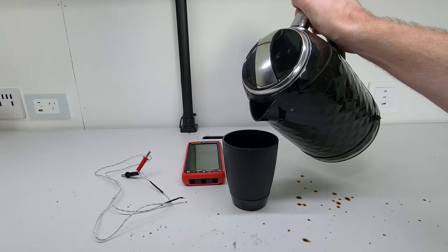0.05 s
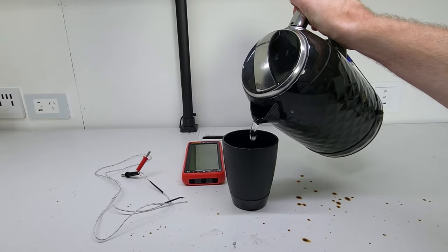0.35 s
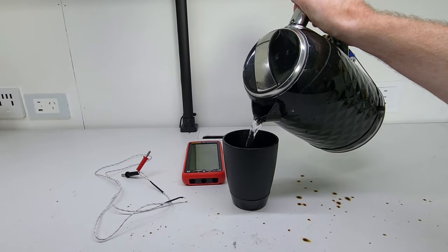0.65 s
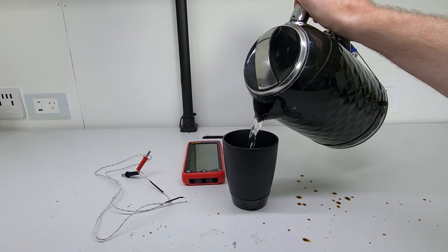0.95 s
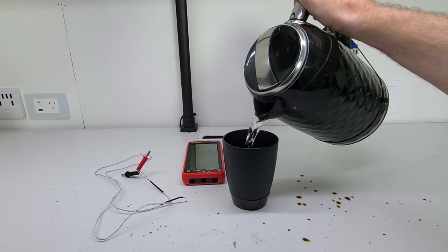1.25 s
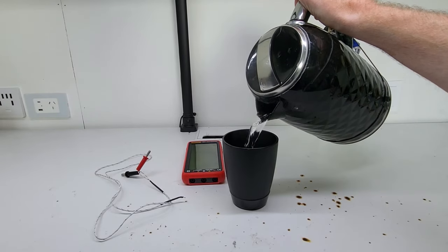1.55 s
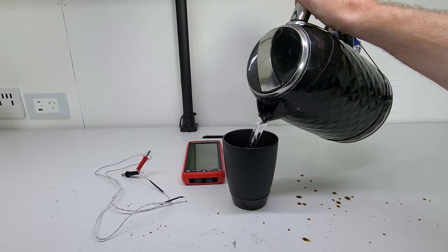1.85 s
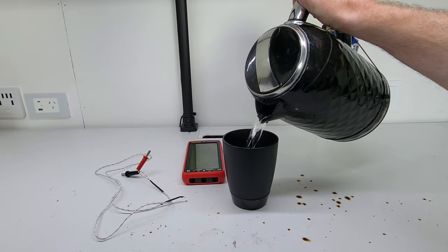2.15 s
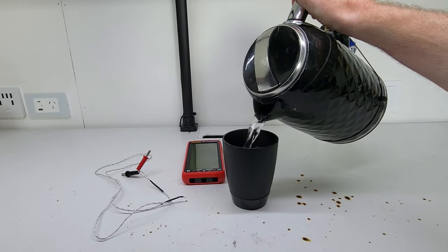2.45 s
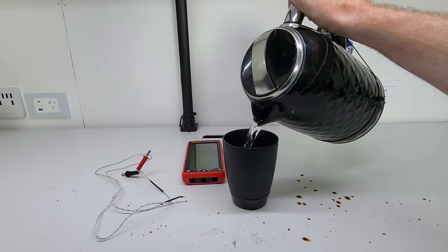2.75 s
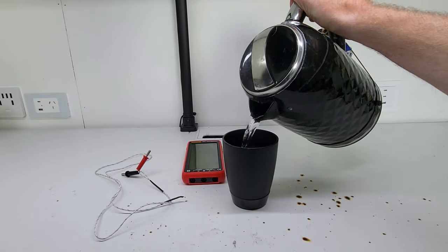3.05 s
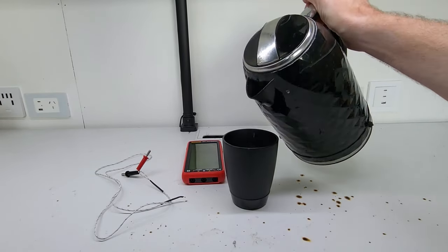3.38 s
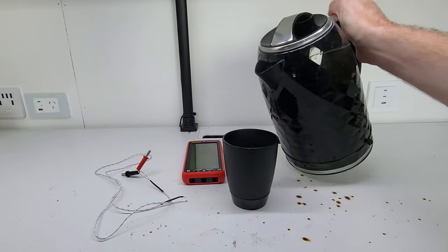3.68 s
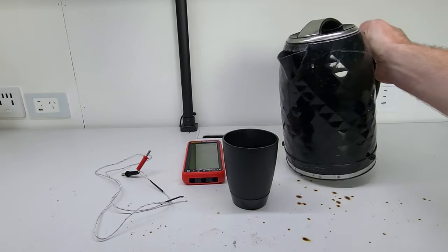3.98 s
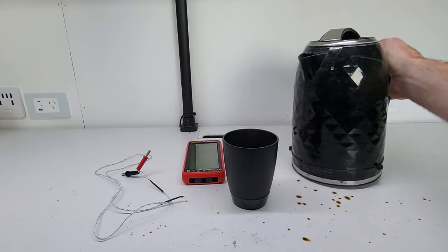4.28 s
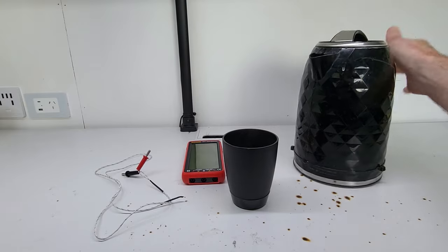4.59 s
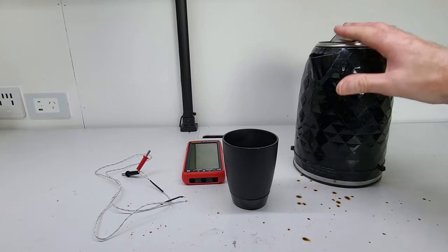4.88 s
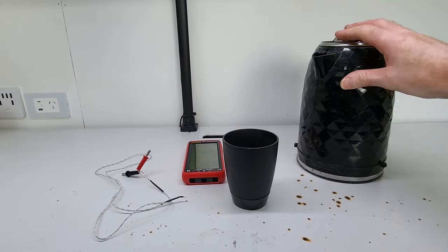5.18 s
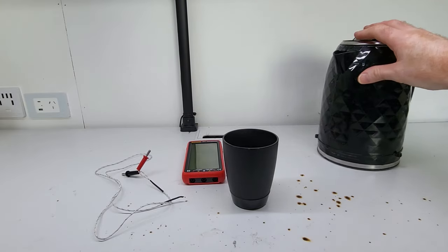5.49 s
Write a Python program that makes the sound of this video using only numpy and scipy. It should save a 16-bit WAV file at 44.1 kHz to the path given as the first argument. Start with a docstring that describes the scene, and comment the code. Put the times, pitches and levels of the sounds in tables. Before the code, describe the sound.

A low ventilation rumble and the faint simmer of a hot electric kettle run underneath, in a small room with little echo. At about 0.5 seconds the first drops tick into a cup, and a thin stream of water follows. The pour is fullest from about 1.1 to 2.3 seconds, with fine spray, small splashes, gurgles and ringing bubbles, while a hollow note rises as the cup fills. The stream thins with a few soft, deep plops and ends around 3.4 seconds. At 4.1 seconds the kettle lands on a workbench and rocks on its base, making a quick run of hollow clunks, thuds and light lid rattles. These are much louder than the pour, peaking near 4.4 seconds and settling by 4.6. Water sways faintly inside. From about 5.1 seconds the kettle is pushed across the bench with a light knock and a chattering, grinding scrape, lasting until about 5.5 seconds.

```python
"""Hot water trickles from an electric kettle into a cup on a workbench.
The stream sprays and gurgles, drops tick, bubbles ring, and the air in the cup sounds a rising note.
The kettle is set down and rocks on its base with hollow clunks. Then it is pushed across the bench,
and its foot chatters as it sticks and slips. Behind it all, the kettle simmers softly
and the ventilation of the small room rumbles."""
import sys
import numpy as np
from scipy import signal
from scipy.fft import rfft, irfft
from scipy.io import wavfile
from scipy.ndimage import uniform_filter1d

SR = 44100
rng = np.random.default_rng(int(sys.argv[2]) if len(sys.argv) > 2 else 0)


def store_wav(level_fs):
    """Save 16-bit WAV to argv[1]."""
    pcm = np.round(np.clip(np.atleast_2d(level_fs), -1, 1) * 32767)
    wavfile.write(sys.argv[1], SR, pcm.T.astype(np.int16))


N = 243867
TIME = np.arange(N) / SR

# A "colour" says how strong low and high sounds are. A fade time (t60) is the time to fall by 60 dB.
# Levels in the tables are relative: the functions turn them up or down.
# colour of the ventilation: (frequency [Hz], level [dB])
VENT_COLOUR = [(25, -36.5), (42, -9), (69, -5), (104, -6.5), (169, -31), (235, -20), (520, -24.5),
               (1100, -28.5), (1750, -41), (4750, -47.5), (6200, -38.5), (7200, -41), (8600, -61.5),
               (12000, -50.5), (15500, -53)]
# the simmer, quietest while the kettle is tipped furthest and lifted away: (time [s], level [dB])
SIMMER_LEVELS = [(0, -56), (2.1, -62), (2.9, -76), (3.6, -72.5), (5.53, -61)]
# colour of the simmer: (frequency [Hz], level [dB])
SIMMER_COLOUR = [(100, -1), (250, -2.5), (600, -5), (900, -6), (1080, 0.5), (1240, 6.5), (1400, 0.5),
                 (1650, -13), (2300, -22.5), (4000, -55), (9000, -101.5)]
# drops that tick on the water: (time [s], level [dB], pitch [Hz])
DROPS = [(0.4407, -53, 6100), (0.6453, -43.5, 5700), (0.7193, -50, 6100), (0.7953, -40.5, 5830),
         (0.836, -51, 5940), (0.963, -48.5, 5900), (1.0545, -39, 5770), (1.3245, -39.5, 6030),
         (1.3424, -37, 5630), (1.3673, -42, 6400), (1.414, -39, 6500), (1.4314, -33.5, 5800),
         (1.485, -55, 5700), (1.5, -39, 5600), (1.6587, -39, 5600), (1.7823, -43, 6030),
         (1.8683, -42.5, 5550), (2.017, -44, 5660), (2.151, -43, 3500), (2.1736, -39, 6300),
         (2.2478, -41, 6500), (2.7678, -42.5, 4840), (2.9717, -49, 6400), (3.0689, -44, 4000),
         (3.1423, -48, 4530), (3.3836, -41, 7140)]
# colour of scattered droplets: (frequency [Hz], level [dB])
SPATTER_COLOUR = [(500, -2), (2000, 0), (3500, -3), (5000, -1.5), (7000, 1), (8600, -11.5), (11000, -9.5),
                  (15500, -18)]
# tones of the air in the cup: (pitch [Hz], width [Hz], level [dB])
CUP_TONES = [(1230, 480, 10.5), (1900, 520, 3.5), (3480, 630, -8), (443, 500, -3.5)]
# strength of the stream: (time [s], level [dB])
FLOW_LEVELS = [(0.62, -76), (0.98, -80), (1.15, -66.5), (1.42, -65.5), (1.95, -70), (2.6, -72.5),
               (2.88, -77.5), (3.4, -81)]
# colour of the fine spray: (frequency [Hz], level [dB])
SPRAY_COLOUR = [(300, -7.5), (1000, -5), (2500, -3.5), (3500, 5), (4700, -2), (5800, 10), (7200, 7.5),
                (8600, -19.5), (11000, -27), (15500, -11)]
# single bubbles in the cup: (time [s], level [dB], pitch [Hz])
BUBBLES = [(0.733, -53, 1890), (0.758, -63.5, 3230), (0.876, -47.5, 1046), (0.893, -50, 3380),
           (0.966, -46.5, 1037), (0.989, -50, 1010), (1.129, -46.5, 1027), (1.303, -47, 1350),
           (1.392, -44.5, 1203), (1.787, -48, 1220), (1.85, -45, 1306), (2.018, -47.5, 1257),
           (2.039, -46.5, 1340), (2.151, -49, 1320), (2.161, -43.5, 1300), (2.359, -33.5, 1304),
           (2.375, -47, 1370), (2.442, -52, 1846), (2.481, -49.5, 1404), (2.646, -54, 2880),
           (2.684, -45.5, 1340), (2.935, -51, 1410), (3.292, -51.5, 1890), (3.336, -54, 1900)]
# deep glugs inside the kettle: (time [s], level [dB])
PLOPS = [(2.724, -44.5), (3.051, -44.5), (3.349, -45)]
# the stream breaks up and spatters: (time [s], level [dB], fade time [s])
SPLASHES = [(0.835, -63.5, 0.48), (1.391, -60, .35), (1.485, -59, 0.099), (1.597, -49, 0.041),
            (1.618, -57.5, 0.31), (1.702, -53.5, 0.032), (1.781, -52, .1), (1.849, -60.5, 0.057),
            (2.152, -57, 0.19), (2.6808, -54.5, 0.1), (2.7132, -56, 0.11), (2.836, -66, 0.075),
            (3.384, -86, 0.073)]
# the kettle hits the bench: (time [s], thud [dB], ring [dB], tick [dB], how flat it lands [0-1])
KNOCKS = [(4.1367, -10, -18.5, -48, 0.01), (4.2451, -12, -21.5, -35.5, 0.2), (4.31, -24.5, -42, -49, 0.9),
          (4.366, -24.5, -40, -41, 0.6), (4.381, -8.5, -19.5, -14.5, 1), (4.3928, -17, -24, -41, 1),
          (4.4211, -14, -19.5, -26, 0.5), (4.5542, -19, -27, -37, 0.79), (4.566, -22, -49, -48, 1),
          (5.168, -29.5, -34, -68, 0.7)]
# tones of the bench top: (pitch [Hz], level [dB], fade time [s])
BENCH_TONES = [(55.5, -12, 0.61), (82.1, -5, 0.27), (113.3, 6, 0.07), (151.6, 8.5, 0.073),
               (180.7, -6.5, 0.15), (245, -13.5, 0.28)]
# tones of the kettle's shell: (pitch [Hz], level on its rim [dB], level when flat [dB], fade time [s])
SHELL_TONES = [(363.6, -10.5, -9.5, 0.31), (442, -13, 0.5, 0.15), (475, -10, 4, 0.09),
               (534, -15, -7.5, 0.23), (590, -13, -9.5, 0.19), (689, 5, -1, 0.072), (829, -12.5, -11, 0.18),
               (1110, -4, -16, 0.063), (1208, -22, 14.5, 0.026), (1365, 6.5, -14, 0.059),
               (1495, -10, -23, 0.073), (1780, -28, -4.5, 0.036), (1798, -28, -4, 0.05),
               (2010, -12, -9.5, 0.065), (2300, -12, -37, 0.042), (2610, -6, -40, 0.032),
               (2870, -24, 0.5, 0.026), (3240, -32, -12, 0.048), (3700, -36, -18, 0.033)]
# colour of the shell's toneless clatter: (frequency [Hz], level [dB])
CLATTER_COLOUR = [(120, -42), (230, -2), (310, -5.5), (450, 18), (700, 3.5), (950, 6), (1350, 11),
                  (1700, 4), (2500, -3), (4000, -17.5), (7000, -16), (9000, -32.5), (15000, -31)]
# light ticks of the lid and rim: (time [s], level [dB])
LID_TICKS = [(4.141, -24.5), (4.4962, -32.5), (4.521, -40), (4.532, -31.5), (4.596, -43)]
# colour of a hard tick: (frequency [Hz], level [dB])
TICK_COLOUR = [(500, -4), (1300, 13), (2900, 9), (4800, 6.5), (7200, 4), (8600, -9.5), (12000, -7),
               (15500, -17)]
# the rim rubs on the bench as the kettle settles: (time [s], length [s], level [dB], pitch [Hz])
RUBS = [(4.53, 0.013, -46.5, 2970), (4.71, 0.19, -71.5, 2530)]
# colour of the foot grinding on the bench: (frequency [Hz], level [dB])
GRIND_COLOUR = [(35, -28), (60, -29), (118, 0.5), (171, -7), (215, -20), (305, -8), (443, -16.5),
                (613, -21), (1120, -11.5), (1670, -19.5), (2650, -19), (3190, -20.5), (5840, -20),
                (7300, -23), (8300, -35), (15500, -77)]
# tones of the sliding base: (pitch [Hz], width [Hz], level [dB])
BASE_TONES = [(435, 35, 3), (805, 17, -4), (1135, 14, -4), (1790, 45, -4.5), (2560, 45, -5.5),
              (3660, 280, -18)]


def undb(db):
    """Turn decibels into a number to multiply by."""
    return 10 ** (np.asarray(db) / 20)


def unit(x):
    """Scale a sound to an average power of 1."""
    return x / np.sqrt(np.mean(x ** 2))


def fade(t, t60):
    """Die away, 60 dB down after t60 seconds."""
    return np.exp(-np.log(1000) * t / t60)


def swell(start_s, rise_s):
    """Rise smoothly from 0 towards 1."""
    return 1 - np.exp(-np.maximum(TIME - start_s, 0) / rise_s)


def curve(rows, attack_s=0.0086, release_s=0.039):
    """Follow (time [s], level [dB]) rows, fading to silence outside them."""
    s, db = np.transpose(rows)
    outside = np.maximum(s[0] - TIME, 0) / attack_s + np.maximum(TIME - s[-1], 0) / release_s
    return undb(np.interp(TIME, s, db)) * np.exp(-outside)


def wander(per_second):
    """Drift at random around 0, typically by about 1."""
    step = int(SR / per_second)
    stairs = np.repeat(rng.standard_normal(N // step + 1), step)
    return unit(uniform_filter1d(stairs, step)[:N])


def add(out, s, sound):
    """Mix a sound in at s seconds."""
    i = int(s * SR)
    out[..., i:i + sound.shape[-1]] += sound[..., :max(N - i, 0)]


def convolve(x, response):
    """Let every sample of x set off a copy of the response."""
    return signal.fftconvolve(np.atleast_2d(x), np.atleast_2d(response), axes=-1)[:, :x.shape[-1]]


def colour(x, points, size=4096):
    """Shape a sound with a colour table; white noise keeps its power."""
    hz, db = np.transpose(points)
    grid_hz = np.maximum(np.fft.rfftfreq(size, 1 / SR), 1)
    gains = undb(np.interp(np.log(grid_hz), np.log(hz), db))
    # build the filter so that it never sounds before its input does
    cepstrum = irfft(np.log(gains))
    cepstrum[1:size // 2] *= 2
    cepstrum[size // 2 + 1:] = 0
    response = irfft(np.exp(rfft(cepstrum)))
    return convolve(x, response / np.linalg.norm(response))


def keep(x, hz, kind, order):
    """Keep the "low" or "high" side of hz; a higher order cuts more sharply."""
    return signal.sosfilt(signal.butter(order, hz, kind, fs=SR, output="sos"), x)


def resonance(x, hz, width_hz):
    """Keep a band around one pitch."""
    return signal.lfilter(*signal.iirpeak(hz, hz / width_hz, fs=SR), x)


def narrow(x, hz, width_hz):
    """Keep a band with steeper edges."""
    return resonance(resonance(x, hz, width_hz), hz, width_hz)


def struck_tones(table, left_lag):
    """Ring (pitch [Hz], level [dB], fade time [s]) rows; the left side lags by left_lag(hz) radians."""
    t = TIME[:SR]
    return sum(undb(db) * fade(t, t60) * np.sin(2 * np.pi * hz * t - np.array([[left_lag(hz)], [0]]))
               for hz, db, t60 in table)


def pan(x, right_db):
    """Make the right side louder than the left."""
    return x * undb(np.array([[-right_db], [right_db]]) / 2)


def wide_noise(shared_hz):
    """Noise with the same bass on both sides and unrelated treble."""
    middle, side = rng.standard_normal((2, N))
    side = keep(side, shared_hz, "high", order=2)
    return np.array([middle + side, middle - side]) / np.sqrt(2)


def crackle(per_second, scatter_db, t60):
    """Tiny bursts of noise at random times, most small and a few large."""
    size = undb(scatter_db * np.minimum(rng.exponential(size=N), 3.5))
    hits = rng.random(N) < per_second / SR
    power = convolve(hits * size ** 2, fade(TIME[:SR // 20], t60) ** 2)
    return unit(np.sqrt(np.abs(power)) * rng.standard_normal((2, N)))


def ventilation():
    """The ventilation rumbles, with a faint hiss that wavers."""
    waver_db = 0.6 * wander(per_second=5)
    air = colour(wide_noise(shared_hz=220), VENT_COLOUR)
    rumble = unit(narrow(rng.standard_normal(N), hz=56, width_hz=29))
    return pan(undb(-58.5 + waver_db) * air + undb(-66) * rumble, right_db=1)


def simmer():
    """The hot kettle seethes softly, fading during the pour and coming back after it."""
    flicker = undb(1.2 * wander(per_second=40))
    seethe = colour(wide_noise(shared_hz=340), SIMMER_COLOUR)
    return pan(curve(SIMMER_LEVELS) * flicker * seethe, right_db=0.87)


def drops(snap_db=-11, cup_db=-14):
    """Each drop snaps, traps one tiny bubble and nudges the air in the cup."""
    out, t = np.zeros((2, N)), TIME[:SR // 20]
    for s, db, hz in DROPS:
        snap = rng.standard_normal((2, len(t))) * fade(t, t60=0.018)
        impact = undb(snap_db) * colour(snap, SPATTER_COLOUR) + undb(cup_db) * cup_air(snap)
        add(out, s, undb(db) * bubble(hz, t60=0.0076, rise=0.0098))
        add(out, s, undb(db) * impact)
    return out


def bubble(hz, t60, rise, swell_cycles=0.76, left_lag_radians=1.03):
    """One bubble rings; rise sets how much its pitch climbs as it nears the surface."""
    t = TIME[:int(t60 * SR) + 2]
    phase = 2 * np.pi * hz * t * (1 + rise * t / t60)
    loudness = (1 - np.exp(-t * hz / swell_cycles)) * fade(t, t60)
    return loudness * np.sin(phase - np.array([[left_lag_radians], [0]]))


def cup_air(splash):
    """The air in the cup rings with every splash."""
    return sum(undb(db) * narrow(splash, hz, width) for hz, width, db in CUP_TONES)


def stream(hollow_db_per_s=3.5):
    """One gushing flow drives fine spray, stray droplets, swarms of bubbles and the air in the cup."""
    flow = curve(FLOW_LEVELS) * undb(1.3 * wander(per_second=22.24))
    spray = crackle(per_second=900, scatter_db=5.5, t60=0.011)
    patter = crackle(per_second=70, scatter_db=3.5, t60=0.008)
    fizz = froth(per_second=520, low_hz=3000, high_hz=7200, cycles=42, range_db=13)
    gurgle = froth(per_second=160, low_hz=1100, high_hz=2100, cycles=18, range_db=9)
    droplets = undb(-0.5) * colour(spray, SPRAY_COLOUR) + undb(-2.5) * colour(patter, SPATTER_COLOUR)
    hollow = unit(cup_air(spray + patter)) + undb(-6.5) * gurgle + undb(-0.5) * filling_note()
    # the cup sounds hollower as the pool deepens
    mid_pour_s = np.mean(FLOW_LEVELS, axis=0)[0]
    hollow_gain = undb(2.5 + hollow_db_per_s * (TIME - mid_pour_s))
    return flow * (droplets + undb(-4.5) * fizz + hollow_gain * hollow)


def froth(per_second, low_hz, high_hz, cycles, range_db):
    """A swarm of small bubbles, most faint and a few loud; the lower ones ring longer."""
    out = np.zeros((2, N))
    for when, pitch, strength in rng.random((int(per_second * N / SR), 3)):
        hz = low_hz + (high_hz - low_hz) * pitch
        add(out, when * N / SR, undb(range_db * strength ** 3) * bubble(hz, t60=cycles / hz, rise=0))
    return unit(out)


def filling_note(empty_hz=895, full_hz=1413, width_hz=110):
    """Splashes sound the air above the water; its note climbs as that space gets shorter."""
    hz = empty_hz + (full_hz - empty_hz) * swell(FLOW_LEVELS[0][0], rise_s=0.99)
    splatter = crackle(per_second=200, scatter_db=4, t60=0.01)
    flutter = keep(splatter, width_hz / 2, "low", order=2)
    return unit(flutter * np.sin(2 * np.pi * np.cumsum(hz) / SR))


def bubbles(bubble_t60=0.037, plop_hz=235, plop_t60=0.034, ring_db=5, burble_db=-8.5):
    """Bubbles and deep plops ring; the heaving surface makes each burble around its pitch."""
    out, t = np.zeros((2, N)), TIME[:SR // 10]
    rings = [(s, db, hz, bubble_t60) for s, db, hz in BUBBLES]
    rings += [(s, db, plop_hz, plop_t60) for s, db in PLOPS]
    for s, db, hz, t60 in rings:
        burble = narrow(rng.standard_normal((2, len(t))), hz, width_hz=0.5 * hz)
        add(out, s, undb(db + ring_db) * bubble(hz, t60, rise=0.003))
        add(out, s, undb(db + burble_db) * unit(burble) * fade(t, t60=0.09))
    return out


def splashes(slap_db=3, slap_t60=0.02, spatter_db=1.5, cup_db=2):
    """A slap on the water, then a shower of droplets that dies away; both ring the cup."""
    slap, shower = np.zeros(N), np.zeros(N)
    for s, db, t60 in SPLASHES:
        add(slap, s, undb(db + slap_db) * fade(TIME[:SR], slap_t60))
        add(shower, s, undb(db) * fade(TIME[:SR], t60))
    droplets = slap * rng.standard_normal((2, N))
    droplets += shower * crackle(per_second=700, scatter_db=4, t60=0.007)
    return undb(spatter_db) * colour(droplets, SPATTER_COLOUR) + undb(cup_db) * cup_air(droplets)


def knocks(bench_lag_s=0.00463, thud_rise_s=0.0017, ring_rise_s=0.0054):
    """Each landing ticks, rings the shell, then bends the bench top; lid and rim tick in between."""
    out, t = np.zeros((2, N)), TIME[:SR]
    thud = struck_tones(BENCH_TONES, lambda hz: hz / 900) * (1 - np.exp(-t / thud_rise_s))
    thud = pan(thud / np.abs(thud).max(), right_db=1)
    for s, thud_db, ring_db, tick_db, flat in KNOCKS:
        ring = undb(-3.5) * shell(flat) * (1 - np.exp(-t / ring_rise_s))
        burst = rng.standard_normal((2, SR)) * fade(t, t60=0.081)
        clatter = undb(-9.5) * colour(burst, CLATTER_COLOUR)
        clunk = undb(ring_db) * (ring + clatter) + undb(tick_db) * tick()
        add(out, s, pan(clunk, right_db=3.2))
        add(out, s + bench_lag_s, undb(thud_db) * thud)
    for s, db in LID_TICKS:
        add(out, s, undb(db) * pan(tick(), right_db=4.7))
    return out


def shell(flat):
    """The kettle rings; how it lands decides which tones are strong, and moving water detunes them."""
    detunes = 1 + 0.012 * rng.standard_normal(len(SHELL_TONES))
    tones = [(hz * detune, rim_db + flat * (flat_db - rim_db), t60)
             for (hz, rim_db, flat_db, t60), detune in zip(SHELL_TONES, detunes)]
    return struck_tones(tones, lambda hz: min(hz / 380, 2.1))


def tick():
    """A hard contact cracks, and the lid and small parts shiver after it."""
    t = TIME[:SR]
    crack = rng.standard_normal((2, SR)) * fade(t, t60=0.015)
    hiss = keep(rng.standard_normal((2, SR)), 17000, "low", order=3)
    shiver = undb(-12) * hiss * fade(t, t60=0.083)
    return undb(-7) * colour(crack + shiver, TICK_COLOUR)


def rubs(width_hz=420, edge_share=0.41):
    """The rim squeaks thinly on the bench; a short rub starts and stops more sharply."""
    out = np.zeros((2, N))
    for s, length_s, db, hz in RUBS:
        edge_s = edge_share * length_s
        contact = swell(s, edge_s) * (1 - swell(s + length_s, edge_s))
        friction = crackle(per_second=900, scatter_db=1.9, t60=0.012)
        out += undb(db) * contact * unit(narrow(friction, hz, width_hz))
    return pan(out, right_db=2.7)


def sway():
    """Water sways in the standing kettle with a low murmur."""
    murmur = unit(narrow(rng.standard_normal(N), hz=96, width_hz=66))
    return undb(-51.5) * swell(start_s=4.76, rise_s=0.15) * murmur


def slide(push_s=5.123, half_speed_after_s=0.063, speed_rise_s=0.11, slips_hz=120, jitter=0.14):
    """The foot sticks and slips; each slip rasps and rings the base, louder as the kettle speeds up."""
    speed = (1 + np.tanh((TIME - push_s - half_speed_after_s) / speed_rise_s)) / 2
    slip_rate = slips_hz * np.exp(jitter * wander(per_second=70))
    slip_phase = np.cumsum(slip_rate) / SR % 1
    slips = np.exp(-slip_phase / 0.2) + 0.42  # sharp pulses on top of steady rubbing
    rasp = unit(slips) * wide_noise(shared_hz=370)
    grind = colour(rasp, GRIND_COLOUR)
    ring = unit(sum(undb(db) * resonance(rasp, hz, width) for hz, width, db in BASE_TONES))
    low_grind = unit(keep(grind, 2240, "low", order=2))
    high_grind = unit(keep(grind, 3600, "high", order=3))
    body = speed * (undb(-45) * low_grind + undb(-47) * ring)
    flicker = undb(1.2 * wander(per_second=40))
    # the foot bites at once; the finest grit builds up slowly
    bite = undb(-56) * flicker * swell(push_s, rise_s=0.042) * high_grind
    grit = undb(-71) * swell(push_s, rise_s=0.41) * unit(narrow(rasp, hz=8300, width_hz=7300))
    return pan(body + bite + grit, right_db=3)


def echoes(x, t60, level_db, gap_s):
    """The room sends back dense echoes that start after a short gap and differ on each side."""
    t = TIME[:SR]
    middle, side = rng.standard_normal((2, SR))
    side = keep(side, 330, "high", order=2)  # both sides share the bass
    tail = np.array([middle + side, middle - side]) * fade(t, t60) * (t > gap_s)
    return undb(level_db) * convolve(x, tail / np.sqrt(np.sum(tail ** 2) / 2))


def scene():
    """Mix the pour and the kettle, their echoes and the quiet background."""
    water = pan(stream() + drops() + splashes() + bubbles(), right_db=2.6)
    kettle = knocks() + rubs() + slide()
    water += echoes(water, t60=0.086, level_db=-12.5, gap_s=0.013)
    kettle += echoes(kettle, t60=0.21, level_db=-8.5, gap_s=0.0094)
    return water + kettle + simmer() + sway() + ventilation()


def record(dry, bottom_hz=38, top_hz=15900):
    """Thin the deepest bass and cut off the highest treble."""
    top_cut = signal.ellip(8, 0.2, 70, top_hz, fs=SR, output="sos")
    return signal.sosfilt(top_cut, keep(dry, bottom_hz, "high", order=4))


dry = scene()
out = record(dry)
store_wav(out)
```